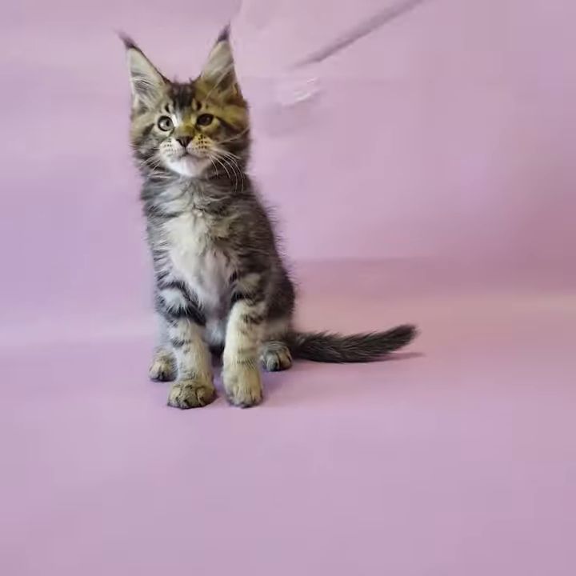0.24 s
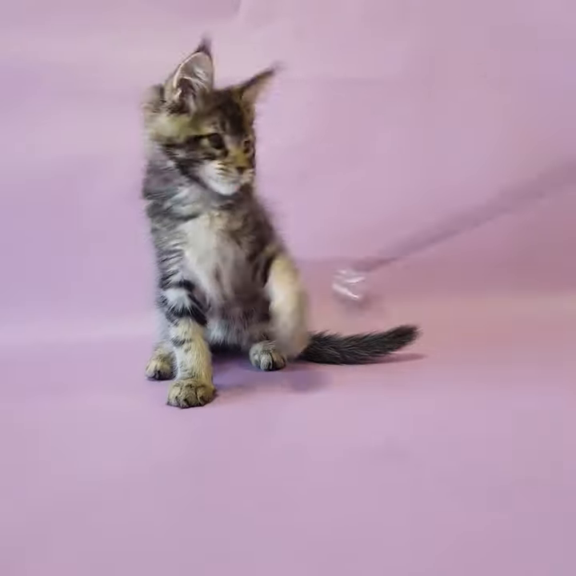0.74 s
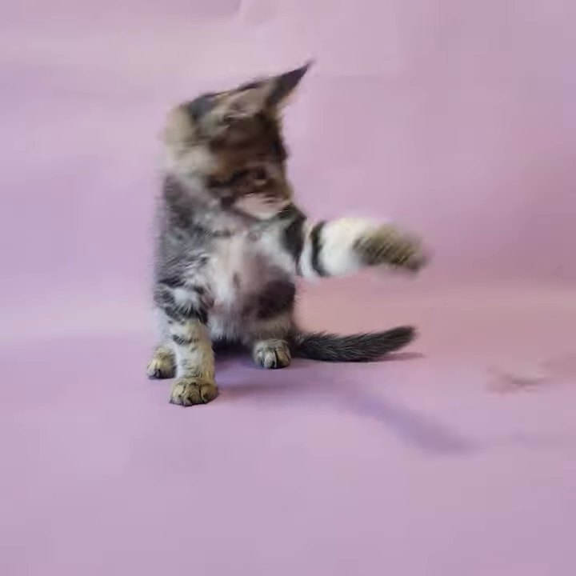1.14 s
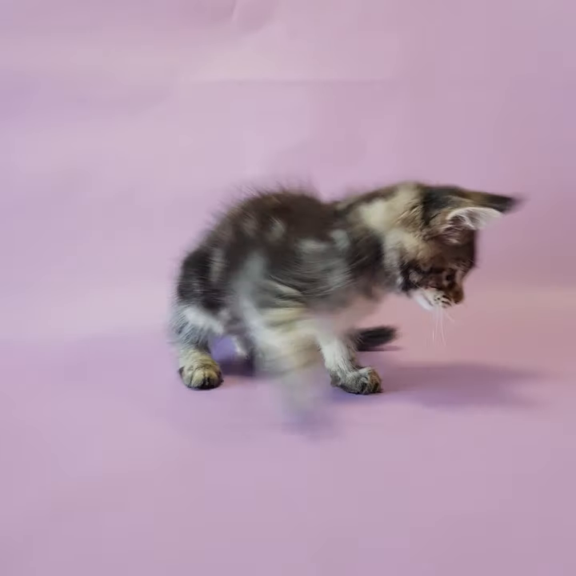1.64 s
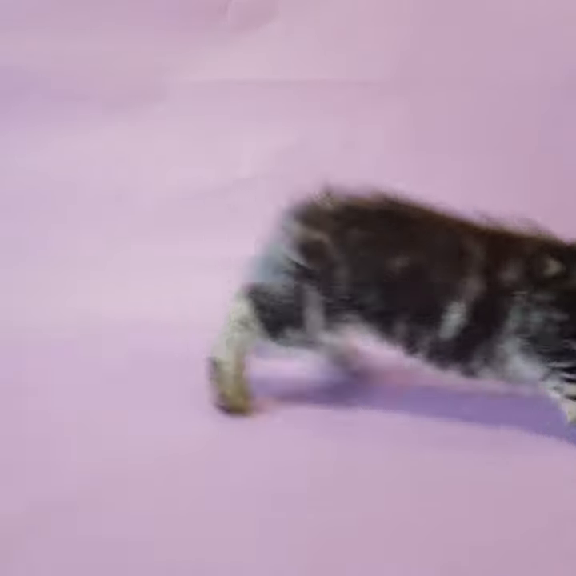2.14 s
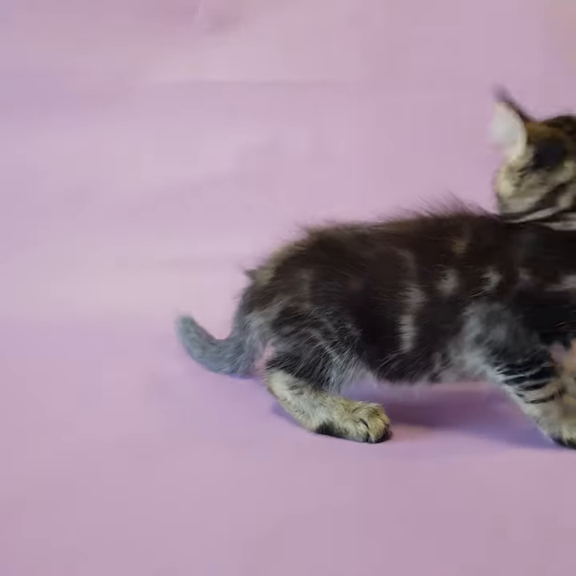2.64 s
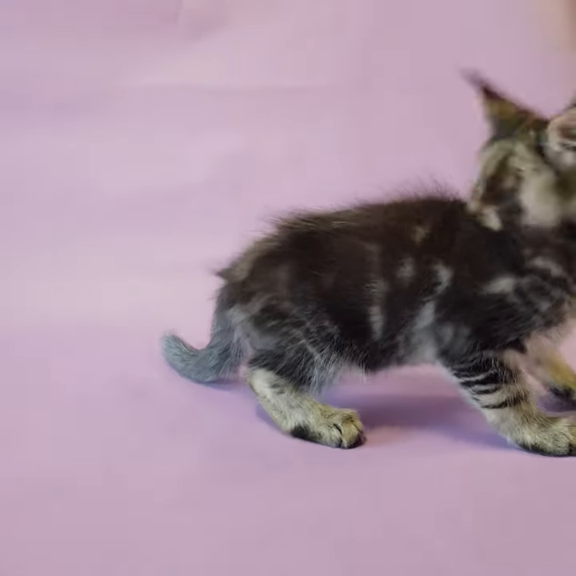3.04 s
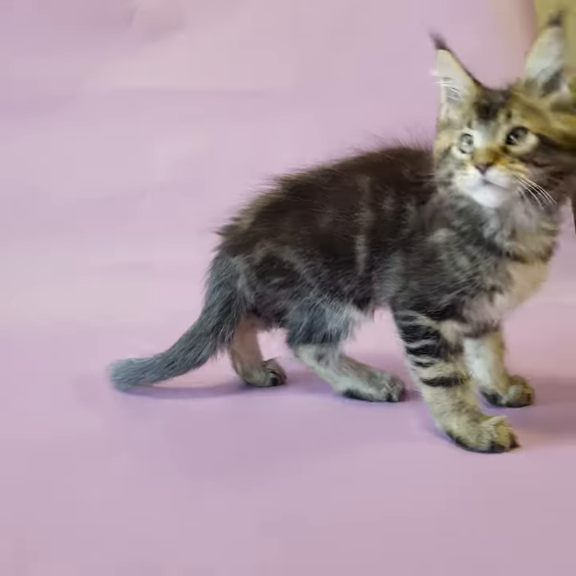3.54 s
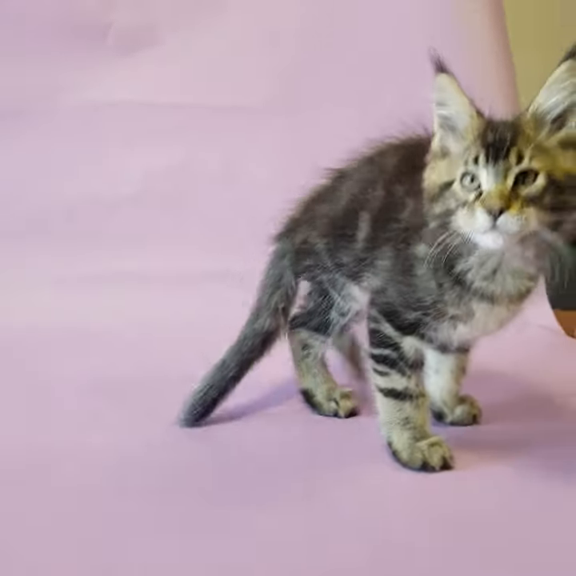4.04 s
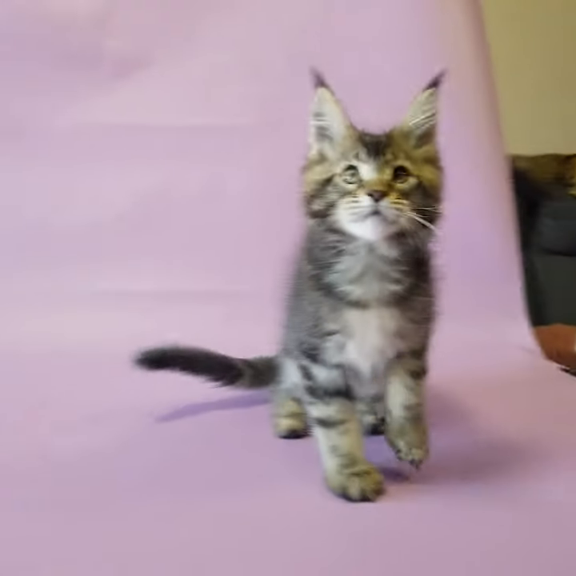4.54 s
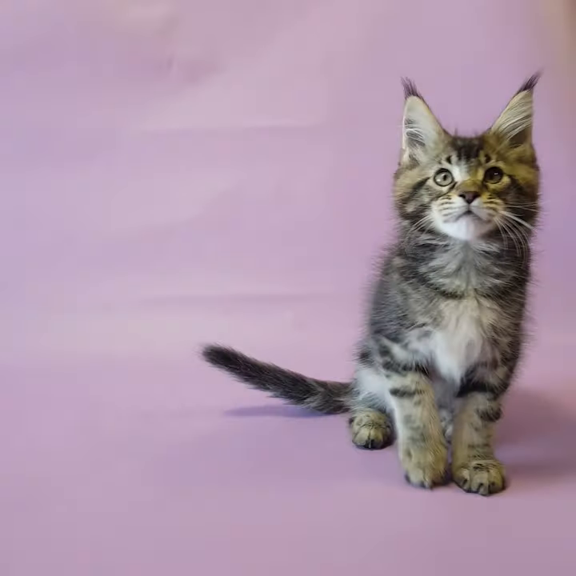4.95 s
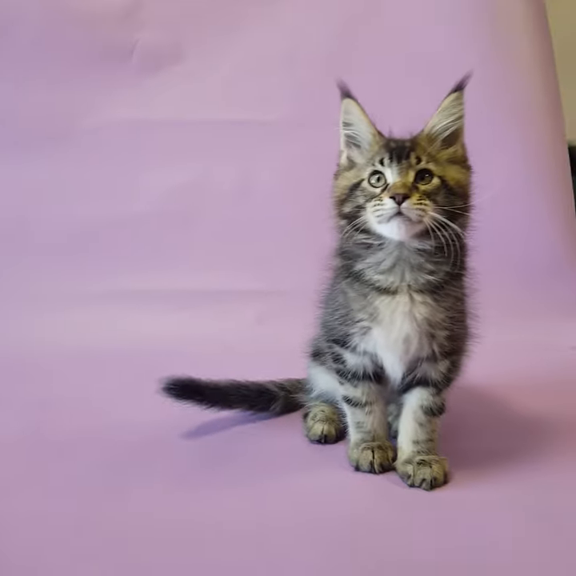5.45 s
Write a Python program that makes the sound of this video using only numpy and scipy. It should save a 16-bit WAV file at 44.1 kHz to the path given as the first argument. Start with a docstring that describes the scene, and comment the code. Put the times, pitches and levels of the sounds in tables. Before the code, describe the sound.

A dry, close indoor scene, lopsided in stereo: the play is all on the left, while the right has only very faint hiss, low hand rumble and trembling, with dull bumps near 2.2, 3.0 and 3.9 s. It starts with a paw thud and a papery scuff at 0-0.3 s, with small crisp foil ticks. Light pats at about 0.5 and 0.6 s lead into a quieter moment. A scratchy paw tap comes at 1.2 s, then quick airy swishes of the wand toy at 1.2-1.9 s. The kitten lunges with a thud at 1.9 s and two heavier, booming thumps around 2.2 s. From then on, very bright, brittle foil snaps come thick and irregular, the strongest near 3.3 and 3.9 s, with softer paper shuffles around 3.0-3.5 and 4.4 s. From 5.0 to 5.5 s a flurry of paws thumps and rustles under continuing crackle until the end.

```python
"""A crinkly foil toy waved on a wand: creases snap as clicks with short rattles, grain noise crackles and swishes.
A kitten pads and pounces after it over paper: noise bands boom, shuffle and scratch with each shove,
and paws thud as noise bursts through the paper modes.
Left is the open microphone port; right is covered, with only faint hiss and the holding hand's
rumble, tremor and bumps (low noise and damped cosines)."""
import sys
import numpy as np
from scipy import signal
from scipy.fft import rfft, irfft, next_fast_len
from scipy.io import wavfile

SR = 44100
rng = np.random.default_rng(int(sys.argv[2]) if len(sys.argv) > 2 else 0)


def store_wav(level_fs):
    """Save 16-bit WAV to argv[1]."""
    pcm = np.round(np.clip(np.atleast_2d(level_fs), -1, 1) * 32767)
    wavfile.write(sys.argv[1], SR, pcm.T.astype(np.int16))


N = 250929


def from_db(db):
    """Amplitude gain of a level in dB."""
    return 10 ** (np.asarray(db) / 20)


def rms_one(x):
    """Scale to rms 1."""
    return x / np.sqrt(np.mean(x ** 2) + 1e-20)


def in_time(rows):
    """Interpolate the columns of a t/s table at every sample."""
    s, *columns = np.transpose(rows)
    t = np.arange(N) / SR
    return [np.interp(t, s, column) for column in columns]


def coloured(x, points):
    """Filter by a spectrum table, linear in log f, falling 62 dB/octave outside it; rms 1."""
    size = next_fast_len(N)
    hz, level_db = np.transpose(points)
    octave = np.log2(np.maximum(np.arange(size // 2 + 1) * SR / size, 1))
    below = np.maximum(np.log2(hz[0]) - octave, 0)
    above = np.maximum(octave - np.log2(hz[-1]), 0)
    gain_db = np.interp(octave, np.log2(hz), level_db) - 62 * (below + above)
    filtered = irfft(rfft(x, size) * from_db(gain_db), size)
    return rms_one(filtered[:N])


def drift(corner_hz):
    """Slow random modulator: noise through a double one-pole low-pass; rms 1."""
    r = np.exp(-2 * np.pi * corner_hz / SR)
    noise = rng.standard_normal(N + SR)
    slow = signal.lfilter([1], [1, -2 * r, r * r], noise)
    return rms_one(slow[SR:])   # first second settles the filter


def resonance(x, hz, width_hz):
    """Two-pole band-pass peak, gain about 1 on top."""
    r = np.exp(-np.pi * width_hz / SR)
    zeros = [(1 - r * r) / 2, 0, (r * r - 1) / 2]
    poles = [1, -2 * r * np.cos(2 * np.pi * hz / SR), r * r]
    return signal.lfilter(zeros, poles, x + 1e-18)


def band(x, low_hz, high_hz):
    """Butterworth band-pass."""
    sos = signal.butter(2, [low_hz, high_hz], "band", fs=SR, output="sos")
    return signal.sosfilt(sos, x + 1e-18)


def grains(base_per_s, spread_db, clump_db, bed):
    """Random clicks of uneven size and sign, clumped by a drifting rate, on a bed of noise."""
    born = rng.random(N) < base_per_s * from_db(clump_db * drift(40)) / SR
    size_db = spread_db * np.minimum(rng.exponential(1, N), 4)
    clicks = born * from_db(size_db) * rng.choice([-1, 1], N)
    return rms_one(clicks) + bed * rng.standard_normal(N)


def swelling(rest, events):
    """Gain per level column: resting curve and events add in power; each event rises, then decays."""
    power, t = from_db(in_time(rest)) ** 2, np.arange(N) / SR
    for top_s, rise_s, t60_s, *levels_db in events:
        span = slice(max(round((top_s - 3 * rise_s) * SR), 0), round((top_s + t60_s) * SR))
        since_s = t[span] - top_s
        rise_db = 20 * since_s / max(rise_s, .001)   # 20 dB per rise_s, from -60 dB
        decay_db = -60 * since_s / max(t60_s, .02)
        shape_db = np.where(since_s < 0, rise_db, decay_db)
        power[:, span] += from_db(np.add.outer(levels_db, shape_db)) ** 2
    return np.sqrt(power)


PORT_HZ, PORT_WIDTH_HZ = 15450, 1500


def port(x):
    """Open-port resonances in series pass the top of the treble."""
    return resonance(resonance(x, PORT_HZ, PORT_WIDTH_HZ), 17400, 7400)


# All table levels are before the output gain.
# paper at rest: t/s, boom level/dB, shuffle level/dB, scratch level/dB
PAPER_REST = [(0.0, -53, -79, -57), (0.34, -51.5, -60.5, -70.5), (0.6, -67, -73, -85),
              (0.82, -56, -70.5, -79), (1.03, -81, -81.5, -89), (1.2, -76, -77, -74),
              (1.4, -68, -67, -58.5), (1.79, -70, -73.5, -68), (2.1, -63, -66, -85),
              (2.34, -57.5, -58.5, -64), (2.67, -59.5, -74.5, -76.5), (3.0, -57.5, -64.5, -76.5),
              (3.6, -66, -65, -57.5), (3.8, -62, -70.5, -72), (4.05, -65, -61.5, -61.5),
              (4.33, -58, -68, -69), (4.74, -60.5, -72.5, -77.5), (5.0, -67, -68, -68.5),
              (5.69, -55, -75, -87)]
# paw shoves: top t/s, rise/s, t60/s, boom level/dB, shuffle level/dB, scratch level/dB
PAPER_SHOVES = [(0.0, 0.011, 0.39, -40.5, -34.5, -44), (.155, .008, 0.35, -56, -42.5, -48.5),
                (.225, 0.13, 0.27, -45, -73, -47), (0.466, 0.0057, 0.35, -62, -53.5, -76),
                (0.626, 0.0052, 0.49, -54, -50.5, -86), (0.678, .05, 0.26, -66, -51, -62.5),
                (.913, 0.058, 0.48, -71, -80, -73), (1.122, 0.11, .4, -65, -79, -85),
                (1.229, 0.0062, 0.38, -57, -49.5, -45), (1.918, 0.24, 0.41, -55.5, -60, -51.5),
                (1.931, 0.0049, 0.37, -48, -45.5, -56), (2.13, 0.013, 0.82, -45, -60, -64.5),
                (2.182, 0.015, 0.34, -36, -48.5, -38), (2.235, 0.0091, 0.32, -33, -44.5, -55.5),
                (2.93, 0.048, .5, -53, -72, -79), (3.013, 0.017, 0.22, -40.5, -80, -81),
                (3.074, 0.049, 0.43, -40, -58.5, -53), (3.201, 0.0089, .65, -45.5, -46, -59),
                (3.51, 0.22, 0.28, -54, -72, -70.5), (4.369, 0.0073, 0.58, -47.5, -56.5, -66),
                (5.051, .008, 1.7, -51, -45, -50.5), (5.15, 0.17, 1.2, -40.5, -50.5, -51.5),
                (5.206, 0.014, 0.36, -37.5, -36, -55), (5.306, .008, 1.35, -39, -42.5, -46),
                (5.49, 0.0069, 0.13, -57, -44, -47), (5.522, 0.0062, 0.18, -38, -41, -63)]
# spectra: f/Hz, level/dB
BOOM_SPECTRUM = [(25, 6.5), (45, -2), (90, -2), (138, 4), (185, -8), (240, -4.5), (400, -14.5)]
SHUFFLE_SPECTRUM = [(200, 1), (350, 1.5), (800, -0.5), (1500, -10.5), (2500, -30)]
SCRATCH_SPECTRUM = [(900, -13), (1600, 2.5), (3000, 1.5), (5000, -1), (8000, -12.5)]


def paper():
    """Weight shifts on the sheet: low noise booms, mid and treble grains shuffle and scratch."""
    boom_gain, shuffle_gain, scratch_gain = swelling(PAPER_REST, PAPER_SHOVES)
    boom = boom_gain * coloured(rng.standard_normal(N), BOOM_SPECTRUM)
    shuffle = shuffle_gain * coloured(grains(900, 3.0, 2.5, .9), SHUFFLE_SPECTRUM)
    shuffle *= from_db(1.5 * drift(30))
    scratch = scratch_gain * coloured(grains(700, 1.9, 2.7, 1.0), SCRATCH_SPECTRUM)
    scratch *= from_db(1.9 * drift(15.4))
    return boom + shuffle + scratch


# toy between swings: t/s, swish level/dB, fine crackle level/dB
TOY_REST = [(0.0, -59, -51), (0.31, -73, -59), (0.56, -73, -63.5), (0.7, -68.5, -58), (1.02, -72, -61),
            (1.2, -58, -52), (1.42, -52, -54), (1.9, -53, -61), (2.11, -70, -67), (2.4, -61.5, -53.5),
            (3.0, -63, -56), (3.4, -66, -52.5), (3.6, -63.5, -52), (4.2, -67, -59.5), (4.52, -80, -62),
            (4.78, -79, -65), (5.0, -68, -53.5), (5.3, -60, -52), (5.69, -62.5, -53.5)]
# wand swings: top t/s, rise/s, t60/s, swish level/dB, fine crackle level/dB
WAND_SWINGS = [(.2, 0.091, .8, -49, -69), (.27, 0.13, 0.076, -57, -56), (.885, 0.013, .2, -53, -47),
               (.948, 0.024, 0.12, -49, -48), (1.156, .03, 0.11, -48, -48),
               (1.247, 0.025, 0.35, -44.5, -64), (1.301, 0.056, 0.17, -38.5, -51),
               (1.59, 0.13, 0.25, -60, -44), (1.634, 0.041, 0.1, -34.5, -56),
               (1.694, 0.07, 0.12, -39.5, -51), (1.792, 0.06, 0.16, -35.5, -58),
               (1.835, 0.028, 0.34, -38.5, -56), (1.886, 0.054, 0.16, -56, -47),
               (2.02, 0.065, .4, -61, -52), (2.15, 0.042, .5, -53, -45), (2.255, 0.13, 0.25, -48.5, -63),
               (2.469, 0.15, 0.11, -54, -57), (2.624, 0.12, 0.11, -57, -42), (2.704, 0.024, 0.15, -58, -44),
               (2.774, 0.047, 0.22, -57, -47), (2.933, 0.054, .4, -57, -61), (3.283, 0.049, 0.17, -55, -44),
               (3.771, .03, 0.1, -55, -51), (3.861, 0.033, 0.25, -60, -41), (3.951, .03, 0.51, -63, -61),
               (4.315, 0.11, 0.85, -61, -49), (4.435, 0.037, .4, -60, -52), (4.697, 0.15, 0.067, -57, -51),
               (4.859, .04, 0.38, -54.5, -61), (5.093, .07, .35, -45, -54), (5.323, 0.049, 0.67, -52, -61),
               (5.517, .05, 0.45, -63, -51)]
# swish spectrum: f/Hz, level/dB
SWISH_SPECTRUM = [(4000, -30), (6000, -9), (7600, 0), (11500, 0), (15500, -4)]
FLUTTER_DB, FLUTTER_CORNER_HZ = 1.8, 12


def crackle_and_swish():
    """Fine foil grains crackle, strands swish through air; returns the sound and the crackle gain."""
    swish_gain, crackle_gain = swelling(TOY_REST, WAND_SWINGS)
    crackle = crackle_gain * rms_one(port(grains(1300, 4.0, 4.0, .28)))
    swish = swish_gain * coloured(grains(4000, 3.0, 2.5, .9), SWISH_SPECTRUM)
    swish *= from_db(1.5 * drift(60))
    flutter = from_db(FLUTTER_DB * drift(FLUTTER_CORNER_HZ))
    return flutter * (crackle + swish), crackle_gain


# grip: t/s, rumble level/dB, tremor level re rumble/dB
GRIP = [(0.0, -54, -5), (0.28, -40, -19), (0.38, -52, -5), (0.54, -42.5, -16), (0.61, -50.5, -10.5),
        (1.9, -46, -11), (2.16, -50.5, -9.5), (2.2, -33.5, -2.5), (2.46, -52.5, -10), (2.79, -43, -16),
        (2.93, -55, -19), (3.0, -38.5, -7), (3.85, -48, -7.5), (3.88, -36, -3), (3.96, -44, -7.5),
        (4.47, -37.5, -12), (5.47, -40.5, -11), (5.5, -48, -12), (5.69, -42.5, -15)]
# spectra: f/Hz, level/dB
RUMBLE_SPECTRUM = [(15, -7.5), (28, -6.5), (46, 9), (70, -5), (110, -29), (150, -52), (200, -26.5),
                   (400, -42), (800, -51.5)]
TREMOR_SPECTRUM = [(70, 9), (95, 1.5), (135, -4), (165, -11)]


def grip():
    """Muscle rumble and tremor of the holding hand: two low noise bands."""
    rumble_db, tremor_db = in_time(GRIP)
    rumble = coloured(rng.standard_normal(N), RUMBLE_SPECTRUM)
    tremor = from_db(tremor_db) * coloured(rng.standard_normal(N), TREMOR_SPECTRUM)
    return from_db(rumble_db) * (rumble + tremor)


# covered-port hiss spectrum: f/Hz, level/dB
HISS_SPECTRUM = [(800, -2.5), (3000, -7.5), (5500, -12), (8500, -22), (11500, -2.5), (14000, -6),
                 (15500, 7)]
HISS_DB, HISS_DRIFT_DB = -77.5, .7


def covered_hiss():
    """Faint coloured noise of slightly drifting level in the covered port."""
    gain = from_db(HISS_DB + HISS_DRIFT_DB * drift(18))
    return gain * coloured(rng.standard_normal(N), HISS_SPECTRUM)


# loud foil snaps: t/s, peak level/dB, lower treble level re peak/dB
LOUD_SNAPS = [(.0114, -23, -16), (.0655, -25.5, -24), (.1015, -30.5, 13), (0.1315, -32, -15),
              (.1527, -41, 12), (.347, -38, 2), (.4088, -25, -24), (.4623, -28, -12), (.541, -45, -6),
              (.585, -47, -26), (0.6325, -39, -17), (0.7, -43.5, 8), (.725, -38, -15), (0.816, -46, 3),
              (.9472, -30, -10), (.98, -46, 7), (1.1124, -43, -14), (1.1418, -38.5, 16),
              (1.197, -37.5, 11.5), (1.2247, -24.5, 12), (1.228, -30, 12), (1.793, -30, 11),
              (1.874, -18, -17), (1.8897, -25, -20), (1.93, -34, 10.5), (2.0232, -23, -28),
              (2.1269, -24, -28), (2.1291, -20, -28), (2.1968, -25, 7.5), (2.2345, -37, 16.5),
              (2.244, -28, 9), (2.2653, -29, -7), (2.3043, -25, -12), (2.3671, -13, -12),
              (2.3817, -19, -27), (2.417, -27.5, 1), (2.4668, -18, -21), (2.5391, -14, -26),
              (2.5434, -14.5, -20), (2.5826, -28, -7), (2.607, -25, -14), (2.6281, -28, -15),
              (2.6914, -24, -22), (2.6939, -19, -30), (2.7663, -25, -8), (2.835, -44, 7),
              (2.8502, -24, -11), (2.8614, -24, -24), (2.9093, -32, 7), (2.912, -21, -22),
              (2.9294, -32, 11), (2.956, -20, -27), (2.9891, -34, -20), (3.0076, -43, -13), (3.03, -39, 5),
              (3.0576, -21, -9), (3.1302, -25, -15), (3.147, -15, -29), (3.1532, -43, -26),
              (3.2512, -20, -25), (3.2669, -26, 3), (3.2729, -8.5, -13), (3.283, -15, -21),
              (3.2898, -18, -22), (3.441, -25, -18), (3.469, -18.5, -29), (3.5124, -14.5, -30),
              (3.5354, -14.5, -29), (3.5944, -27, 11.5), (3.6496, -25, -29), (3.697, -25, -9),
              (3.7198, -20, -12), (3.7547, -16.5, -29), (3.762, -19, -2), (3.7668, -19, -13),
              (3.7904, -25, -32), (3.8534, -14, -2.5), (3.9026, -26, -24), (3.9297, -3.5, -21),
              (3.933, -23, -8), (3.9367, -24, -7), (3.9478, -21, -10), (3.9636, -34, 7), (3.978, -33, 10),
              (4.009, -17, -5), (4.0227, -20.5, -23), (4.089, -18.5, -17), (4.133, -14, -31),
              (4.1358, -25, 0.5), (4.1497, -15, -34), (4.226, -18.5, -37), (4.2546, -18, -9),
              (4.2793, -35.5, 13), (4.293, -17.5, -16), (4.3046, -22, -11), (4.3227, -21, -17),
              (4.3655, -25, -32), (4.4194, -34.5, 8.5), (4.4341, -26, -26), (4.4702, -30.5, 9.5),
              (4.5277, -26, -26), (4.5863, -29, -20), (4.6282, -18, -22), (4.678, -39, 5),
              (4.7237, -34, -25), (4.783, -32, -19), (4.851, -24, 3.5), (4.8613, -15, -17),
              (4.8924, -42, 12.5), (4.936, -21.5, -12), (4.9561, -20, -26), (5.0305, -18.5, -15),
              (5.046, -34, 6), (5.116, -18, -16), (5.1205, -16, -5), (5.1558, -24, -20), (5.1884, -27.5, 3),
              (5.191, -23, -28), (5.2299, -20, -24), (5.294, -20, -28), (5.3129, -12.5, -23),
              (5.3277, -15.5, -21), (5.349, -31.5, -44), (5.4153, -26, -25), (5.4816, -28.5, 9.5),
              (5.4907, -22, -25), (5.522, -17, -19), (5.528, -19, -29), (5.6049, -20, -38),
              (5.651, -16.5, -10.5), (5.6846, -15, -29)]
AFTER_SNAP_WAIT_S, AFTER_SNAP_DB, AFTER_SNAP_SPREAD_DB = 0.0054, -10, 3
SMALL_SNAPS_PER_S = 30
SMALL_SNAP_MIN_DB, SMALL_SNAP_SPREAD_DB = 19, 3   # over the fine crackle gain
SMALL_SNAP_LOWER_MIN_DB, SMALL_SNAP_LOWER_MAX_DB = -27, 1   # lower treble re peak


def all_snaps(crackle_gain):
    """Loud snaps, two weaker ones near each as neighbouring creases give way, random small ones."""
    snaps = list(LOUD_SNAPS)
    chances = rng.random((len(LOUD_SNAPS), 2, 2))
    for (s, peak_db, lower_db), pair in zip(LOUD_SNAPS, chances):
        for order, (wait, size) in enumerate(pair):
            near_s = s + AFTER_SNAP_WAIT_S * (order - .2 - np.log(1 - wait))
            near_db = peak_db + AFTER_SNAP_DB + AFTER_SNAP_SPREAD_DB * (2 * size - 1)
            snaps.append((max(near_s, 0), near_db, lower_db))
    for when, size, colour in rng.random((round(SMALL_SNAPS_PER_S * N / SR), 3)):
        crackle_db = 20 * np.log10(crackle_gain[int(when * N)])
        small_db = crackle_db + SMALL_SNAP_MIN_DB - SMALL_SNAP_SPREAD_DB * np.log(1 - size)
        lower_range_db = SMALL_SNAP_LOWER_MAX_DB - SMALL_SNAP_LOWER_MIN_DB
        snaps.append((when * N / SR, small_db, SMALL_SNAP_LOWER_MIN_DB + colour * lower_range_db))
    return snaps


def foil_snaps(crackle_gain):
    """Each crease snaps as a click and an 11 ms noise rattle, through the port and a lower band."""
    snaps, t = all_snaps(crackle_gain), np.arange(SR // 50) / SR
    out = np.zeros(N + SR)
    rattles = from_db(-19 - 60 * t / .011) * rng.standard_normal((len(snaps), len(t)))
    rattles[:, 0] = 1   # the click
    sharp, dull = port(rattles), band(rattles, 6560, 15760)
    for (s, peak_db, lower_db), high, low in zip(snaps, sharp, dull):
        at = round(s * SR)
        snap = high / np.abs(high).max() + from_db(lower_db) * low / np.abs(low).max()
        out[at:at + len(t)] += from_db(peak_db) * snap
    return out[:N]


# paw falls: t/s, body peak level/dB, boom level re body/dB, claw tick level re body/dB,
# hardness/octaves, contact t60/s
PAW_FALLS = [(0.029, -25.5, -13, -30, 1.4, 0.045), (.152, -33, -0.5, -19, -1.3, 0.042),
             (0.46, -38, -17, -29, 0.066, 0.034), (.623, -70, -22, -30, 0.43, .04),
             (0.633, -44.5, -15, -31, -0.93, 0.043), (1.228, -38, -7.5, 12, 0.34, 0.11),
             (1.444, -52.5, 4, 11.5, 0.71, 0.17), (1.575, -45.5, -14, -2, 1.1, 0.11),
             (1.930, -30, -9, -30, 0.55, 0.13), (2.131, -54, -6, -19, 0.1, .06),
             (2.179, -25, -16, -28, 0.78, 0.27), (2.233, -28.5, -3, 3, 0.78, 0.16),
             (3.018, -47.5, 1.5, -25, -1.3, 0.068), (3.201, -40, -13, -22, 0.19, 0.066),
             (3.210, -41.5, -4, -21, 0.88, 0.15), (3.237, -35.5, -19, -16, 0.22, 0.12),
             (3.488, -41, -17, -23, 0.32, 0.17), (4.368, -45.5, 1, -23, -0.92, 0.07),
             (5.045, -35.5, -5, -19, 0.3, 0.041), (5.113, -43.5, 4.5, 6, -1.1, 0.044),
             (5.204, -35, 4.5, -2, 1.5, 0.037), (5.213, -27.5, 2, -12, 0.36, 0.12),
             (5.272, -31.5, -2, -29, 0.2, 0.16), (5.305, -30.5, -15, -24, 0.069, .07),
             (5.355, -32, -28, -11, 0.95, 0.076), (5.396, -34, -7, -23, 0.23, 0.064),
             (5.454, -30, 1.5, -26, 0.99, 0.054), (5.489, -18.5, -18, -15, 0.91, 0.089),
             (5.519, -22.5, -4, -34, 0.35, 0.16)]
# paper modes: f/Hz, width/Hz, level/dB; the first two make the boom
MODES = [(139, 11, -9.5), (245, 45, -4.5), (356, 150, 3), (550, 30, -2), (817, 160, -1.5),
         (1100, 400, -5.5), (1630, 620, -0.5), (2340, 170, 8.5)]
SOFT_PAD_HZ = 500   # strike centre at hardness 0
TICK_T60_S = 0.015


def paws():
    """A padded blow and dying contact noise ring the paper modes, with a low push and a claw tick."""
    out, t = np.zeros(N), np.arange(SR // 4) / SR
    noises = rng.standard_normal((len(PAW_FALLS), 2, len(t)))
    for (s, peak_db, boom_db, tick_db, hardness, t60_s), noise in zip(PAW_FALLS, noises):
        centre_hz = SOFT_PAD_HZ * 2 ** np.clip(hardness, -1, 2.5)
        burst = noise[0] * from_db(-60 * t / np.clip(t60_s, .01, .5))
        burst[0] = 12   # the blow
        pad_filter = signal.butter(2, 1.85 * centre_hz, fs=SR, output="sos")
        padded = signal.sosfilt(pad_filter, burst)
        rings = [from_db(db) * resonance(padded, hz, width_hz) for hz, width_hz, db in MODES]
        boom, body = sum(rings[:2]), np.zeros(len(t))
        for (hz, _, _), ring in zip(MODES[2:], rings[2:]):
            # modes far from the centre are struck less
            body += from_db(-7 * np.log2(hz / centre_hz) ** 2) * ring
        tick = band(noise[1] * from_db(-60 * t / TICK_T60_S), 2100, 5700)
        parts = [(0, body), (boom_db, boom), (tick_db, tick)]
        fall = sum(from_db(db) * part / np.abs(part).max() for db, part in parts)
        at = round(s * SR)
        out[at:at + len(t)] += from_db(peak_db) * fall[:N - at]
    return out


# finger bumps: t/s, level/dB before the weight, f/Hz, signed amplitude weight of the low thump
FINGER_BUMPS = [(2.203, -20.5, 63, 0.93), (2.267, -27.5, 48.5, 0.83), (3, -21.5, 74.5, -0.76),
                (3.891, -26, 79, 0.98)]


def bumps():
    """Fingers bump the case: cosines of about one cycle under a Gaussian."""
    out, t = np.zeros(N), np.arange(N) / SR
    for s, level_db, hz, weight in FINGER_BUMPS:
        cycles = hz * (t - s)
        bump = np.cos(2 * np.pi * cycles) * np.exp(-(cycles / .48) ** 2)
        out += weight * from_db(level_db) * bump
    return out


def scene():
    """Open port left, covered port right."""
    sheet = paper()
    toy_bed, crackle_gain = crackle_and_swish()
    covered_port = grip() + covered_hiss()
    open_port = sheet + toy_bed + foil_snaps(crackle_gain) + paws()
    return np.array([open_port, covered_port + bumps()])


OUTPUT_GAIN_DB, CUTOFF_HZ = 6, 15850


def record(dry):
    """Fixed gain on both channels, then an elliptic low-pass cuts the top."""
    low_pass = signal.ellip(7, .5, 50, CUTOFF_HZ, fs=SR, output="sos")
    return signal.sosfilt(low_pass, from_db(OUTPUT_GAIN_DB) * dry)


dry = scene()
out = record(dry)
store_wav(out)
```